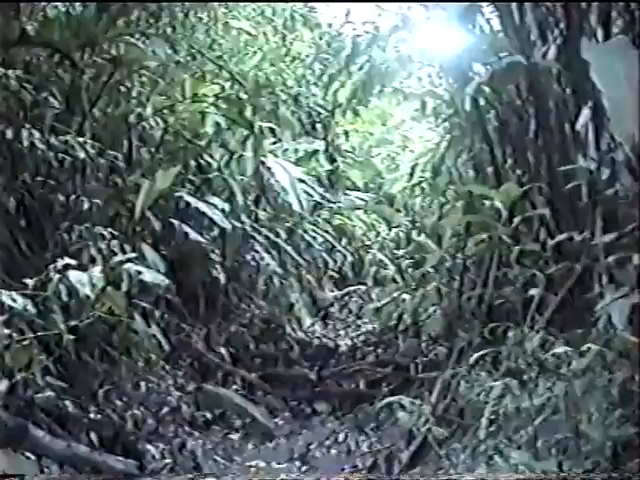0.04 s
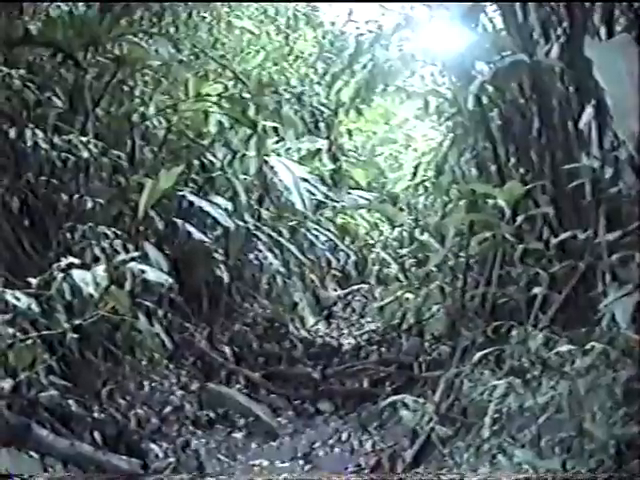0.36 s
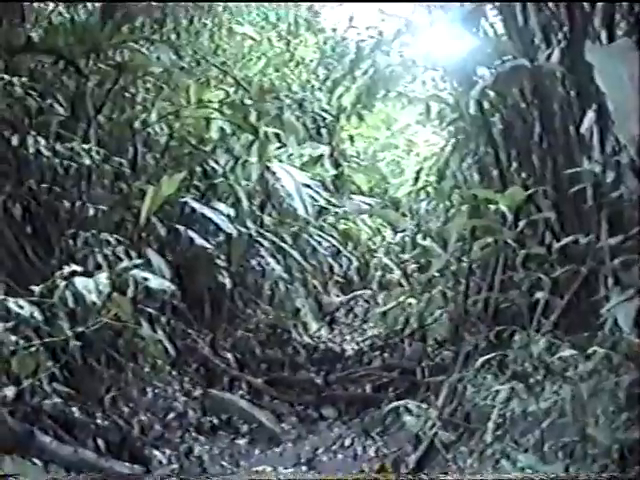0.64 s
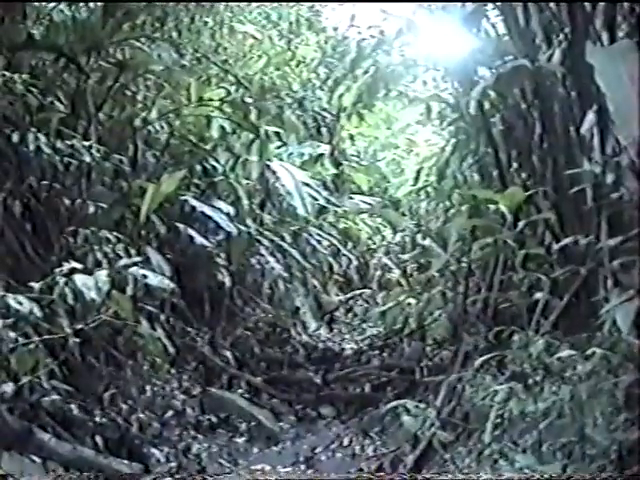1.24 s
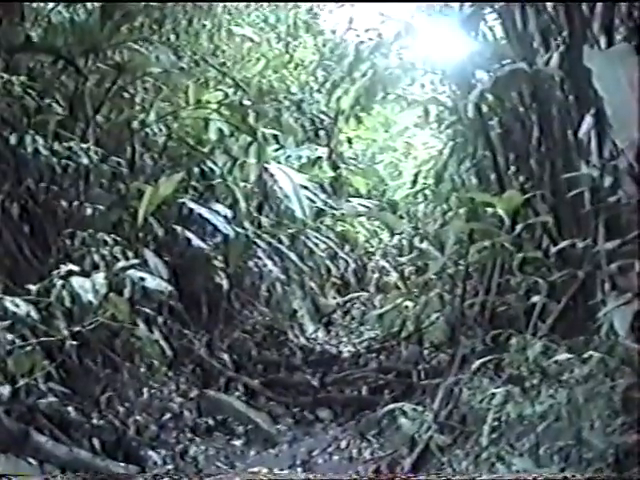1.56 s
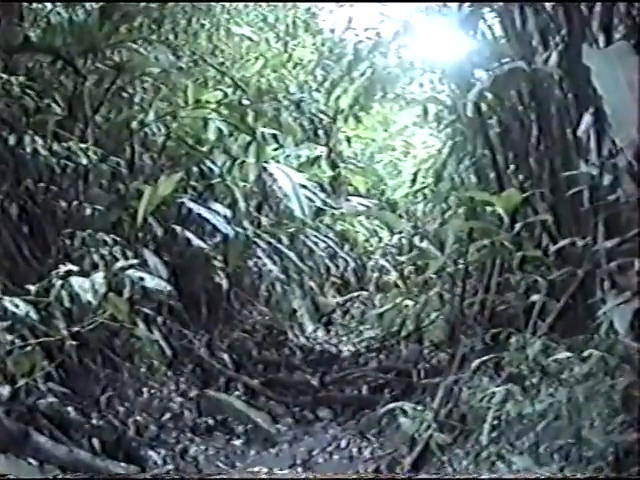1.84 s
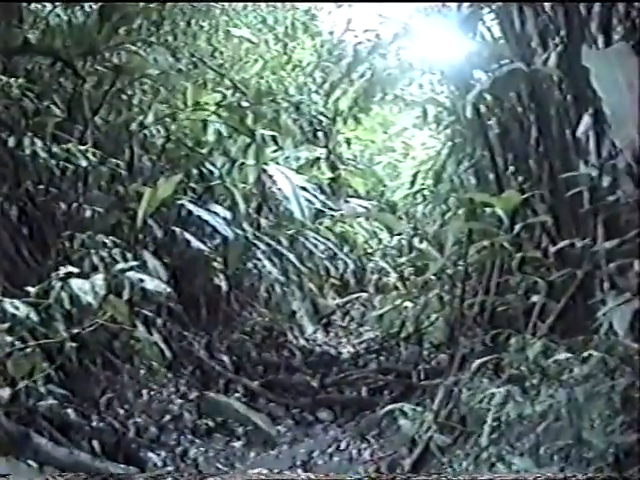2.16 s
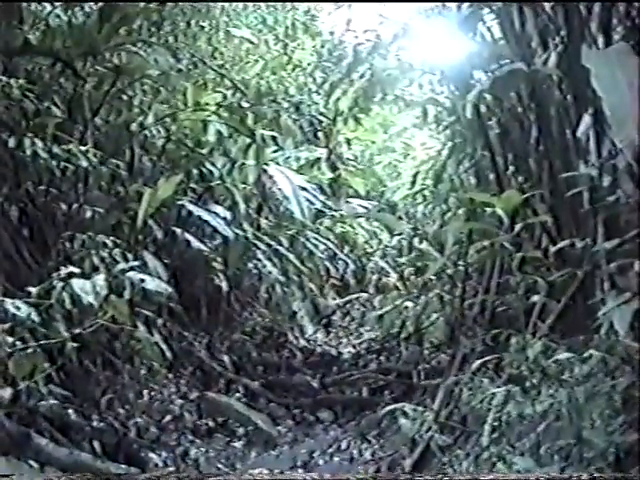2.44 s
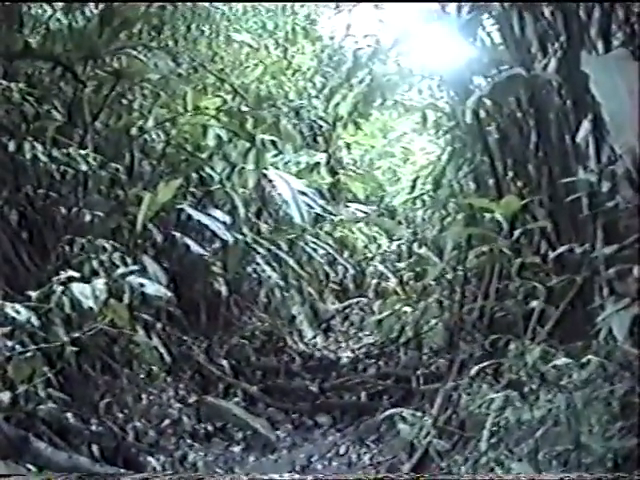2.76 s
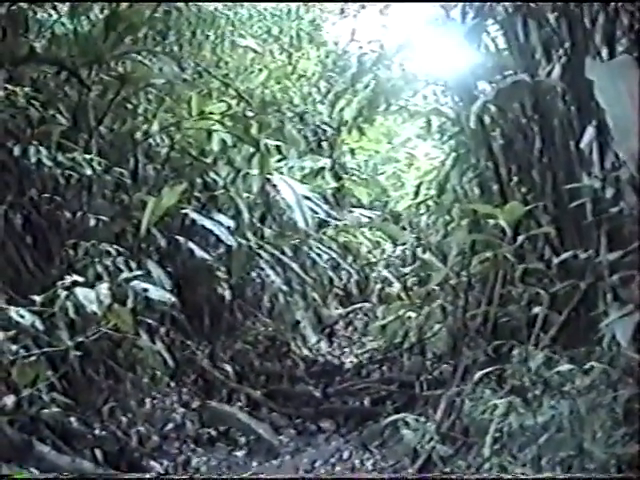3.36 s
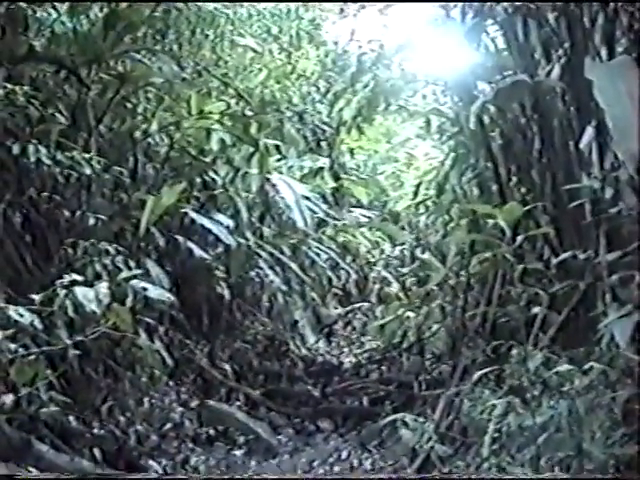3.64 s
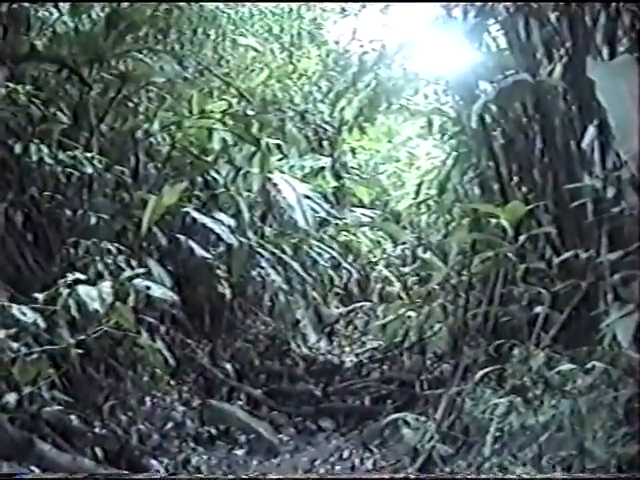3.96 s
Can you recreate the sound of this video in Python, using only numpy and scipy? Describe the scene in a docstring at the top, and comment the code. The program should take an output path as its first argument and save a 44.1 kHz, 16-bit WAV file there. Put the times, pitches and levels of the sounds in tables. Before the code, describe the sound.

Tree frogs calling with short hoots and high rising whistles in a forest, over steady hiss.

```python
"""Tree frogs in a tropical forest

Each call is a short low note, then a longer high whistle that slides up and levels off.
One frog sits near; others answer from further off, smeared by echoes from trunks and leaves,
over a faint far chorus. A small tape camera adds motor whine, hum and hiss. Mono."""
import sys
import numpy as np
from scipy import signal
from scipy.fft import rfft, irfft
from scipy.io import wavfile

SR = 44100
rng = np.random.default_rng(int(sys.argv[2]) if len(sys.argv) > 2 else 0)


def to_wav(sig):
    """Store sig (one row per channel, or 1-D mono) as 16-bit WAV at the path in sys.argv[1].

    Samples outside -1..1 are clipped; the rate is SR.
    """
    pcm = np.clip(np.atleast_2d(sig), -1, 1) * 32767
    pcm = np.round(pcm).astype(np.int16)
    wavfile.write(sys.argv[1], SR, pcm.T)  # frames by channels


N = 176400
ATTACK_S, RELEASE_S = .007, .014
JITTER_HZ, JITTER_RATE_HZ = 18.8, 270
LOW_T60_S, HIGH_T60_S = .45, .81  # tree tail of low and high notes


def from_db(db):
    """Decibels to gain."""
    return 10 ** (np.asarray(db) / 20)


def rms_one(x):
    """Scale to unit rms."""
    return x / np.sqrt(np.mean(x ** 2) + 1e-20)


def drift(rate_hz, size):
    """Smooth random wander, rms about 1."""
    hz = np.arange(N // 2 + 1) * SR / N
    return rms_one(irfft(rfft(rng.standard_normal(N)) / (1 + (hz / rate_hz) ** 2), N))[:size]


def add(out, x, start_s):
    """Mix x into out at start_s."""
    i = int(start_s * SR)
    x, i = x[max(-i, 0):], max(i, 0)
    out[i:i + len(x)] += x[:max(len(out) - i, 0)]


def tone(hz):
    """Unit-rms sine along a pitch curve."""
    return np.sqrt(2) * np.sin(2 * np.pi * np.cumsum(hz) / SR)


def gate(t, length_s):
    """Linear attack, hold, release."""
    return np.clip(t / ATTACK_S, 0, 1) * np.clip((length_s + RELEASE_S - t) / RELEASE_S, 0, 1)


def noise_bands(rows):
    """Noise through steep resonances."""
    hz = np.arange(N // 2 + 1) * SR / N
    out = np.zeros(N)
    for centre_hz, width_hz, db in rows:
        response = (1 + ((hz - centre_hz) / (.75 * width_hz)) ** 2) ** -1.5
        out += from_db(db) * rms_one(irfft(rfft(rng.standard_normal(N)) * response, N))
    return out


def hiss():
    """Steady camera hiss, falling toward the treble."""
    # noise spectrum: f/Hz, density/(dB per Hz)
    spectrum = [(20, -85), (50, -90.5), (130, -88), (250, -92), (500, -94), (1100, -96), (1800, -99.5),
                (2800, -100.5), (4800, -102), (7500, -101.5), (10000, -104), (13000, -107), (15500, -108.5)]
    points_hz, db = np.transpose(spectrum)
    hz = np.maximum(np.arange(N // 2 + 1) * SR / N, 1)
    colour = from_db(np.interp(np.log(hz), np.log(points_hz), db)) * np.sqrt(SR / 2)
    return irfft(rfft(rng.standard_normal(N)) * colour, N)


def camera(waver_hz=1.28, flutter=.23, drum_hz=25, scan_hz=15625):
    """Wavering motor whine, hum of the spinning head drum, casing whirr, thin line-scan tone."""
    # motor partials: f/Hz, level/dB
    partials = [(605, -82.5), (678.3, -79), (812, -81), (829, -72.5), (885.5, -76), (903.5, -73),
                (941, -80), (978.8, -63.5), (1016, -73), (1035.5, -68.5), (1052.5, -71), (1109, -77),
                (1149, -76), (1184.7, -72), (1269, -78), (1277, -74.5), (1566.4, -75)]
    # drum harmonics: multiple, level/dB
    harmonics = [(1, -74.5), (2, -68.5), (3, -74), (6, -71.5), (7, -79.5), (8, -77), (48, -77), (52, -76),
                 (56, -74), (60, -74.5), (64, -87), (72, -77), (76, -77.5)]
    # casing resonances: f/Hz, width/Hz, level/dB
    casing = [(1052, 300, -71.5), (1310, 67, -78.5), (1580, 160, -70.5)]
    t = np.arange(N) / SR
    whine, hum = np.zeros((2, N))
    for hz, db in partials:
        gain = from_db(db) * (1 + flutter * drift(22, N))
        whine += gain * tone(hz + waver_hz * drift(4.33, N))
    for multiple, db in harmonics:
        hum += from_db(db) * np.sqrt(2) * np.sin(2 * np.pi * (multiple * drum_hz * t + rng.random()))
    scan = from_db(-86) * tone(np.full(N, scan_hz))
    return whine + hum + noise_bands(casing) + scan


def far_chorus():
    """Distant frogs, blurred into noise bands."""
    # chorus bands: f/Hz, width/Hz, level/dB
    bands = [(2227, 410, -67), (3845, 170, -68.5), (4110, 106, -70.5)]
    return noise_bands(bands)


def mid_dip(bed, at_s=.784, width_s=.033, depth=.61, centre_hz=2060, width_oct=1.2):
    """The mid range dips once, briefly."""
    hz = np.maximum(np.arange(N // 2 + 1) * SR / N, 1)
    t = np.arange(N) / SR
    mids = irfft(rfft(bed) * np.exp(-(np.log2(hz / centre_hz) / width_oct) ** 2), N)
    return bed - depth * np.exp(-((t - at_s) / width_s) ** 2) * mids


def forest(x, echo_share, t60_s, thicket_t60_s=.53, thicket_db=16, first_echo_s=.017):
    """Direct sound plus thicket scatter and a tail from the trees; echo_share is by energy."""
    t = np.arange(SR) / SR
    trees = from_db(-60 * t / t60_s)
    thicket = from_db(thicket_db - 60 * t / thicket_t60_s)
    onset = np.clip(t / first_echo_s - 1, 0, 1)
    out = signal.fftconvolve(x, (trees + thicket) * onset * rng.standard_normal(SR))
    share = np.clip(echo_share, .01, .99)
    out *= np.sqrt(share * np.sum(x ** 2) / np.sum(out ** 2))
    add(out, np.sqrt(1 - share) * x, 0)
    return out


def low_note(length_s, hz):
    """Short, nearly pure hoot; the pitch sags and recovers."""
    t = np.arange(int((length_s + RELEASE_S) * SR)) / SR
    progress = np.minimum(t / length_s, 1)
    bend_hz = 80 * (progress - .45) ** 2
    return gate(t, length_s) * tone(hz + bend_hz + JITTER_HZ * drift(JITTER_RATE_HZ, len(t)))


def high_note(t, top_hz, glide_s, rise_hz=231.3, rasp_s=.014, rasp_hz=400):
    """Trembling whistle; starts raspy and clears as it slides up to top_hz."""
    hz = top_hz - rise_hz * np.exp(-t / glide_s) + JITTER_HZ * drift(JITTER_RATE_HZ, len(t))
    rasp = .075 + .98 * np.exp(-t / rasp_s)
    lowpass = signal.butter(3, rasp_hz, fs=SR, output="sos")
    rough = signal.sosfilt(lowpass, rng.standard_normal((2, SR)))[:, :len(t)]
    sidebands = rms_one(rough[0]) + 1j * rms_one(rough[1])
    wave = np.exp(2j * np.pi * np.cumsum(hz) / SR) * (np.sqrt(2) + rasp * sidebands)
    return wave.imag / np.sqrt(1 + rasp ** 2)


def spit(top_hz, note_db, relative_db=-12, rise_s=.018, grit_hz=360, below_hz=88.6):
    """Rough burst that opens a high note and hangs in the trees."""
    t = np.arange(SR // 8) / SR
    lowpass = signal.butter(2, grit_hz, fs=SR, output="sos")
    grit = rms_one(signal.sosfilt(lowpass, rng.standard_normal(len(t))))
    envelope = from_db(note_db + relative_db) * t / rise_s * np.exp(1 - t / rise_s)
    burst = envelope * grit * tone(np.full(len(t), top_hz - below_hz))
    return forest(burst, echo_share=.79, t60_s=HIGH_T60_S)


def other_frogs():
    """Answers from deeper in the forest; each high note swells, then fades."""
    # low notes: t/s, length/s, f/Hz, level/dB, echo share
    low_notes = [(0.059, 0.046, 2270, -62, .7), (.175, 0.024, 2140, -62.5, 0.3),
                 (0.489, 0.055, 2310, -63.5, 0.5), (.6, 0.048, 2130, -67, 0.2),
                 (.91, 0.063, 2130, -63, 0.4), (1.101, 0.021, 2205, -56, 0.5),
                 (1.424, 0.063, 2100, -53, 0.3), (1.57, 0.032, 2096, -60, 0.06),
                 (1.7, 0.063, 2280, -55, 0.1), (1.754, 0.038, 2210, -60, 0),
                 (2.038, 0.025, 2380, -60.5, 0.4), (3.004, 0.062, 2106, -54.5, 0.15),
                 (3.395, 0.059, 2320, -66.5, 0.1), (3.766, 0.048, 2020, -61.5, .6)]
    # high notes: t/s, length/s, top f/Hz, glide/s, level/dB, echo share
    high_notes = [(-.12, 0.093, 3935, 0.021, -47, 0.35), (0.113, 0.1, 3950, 0.032, -51.5, 0.33),
                  (0.21, 0.084, 4013, 0.025, -54, .6), (0.309, 0.17, 4050, 0.055, -60, 0.5),
                  (.5, 0.13, 4230, 0.0296, -62.5, 0.9), (0.628, 0.11, 3877, 0.029, -59, .5),
                  (0.881, .2, 4246, .02, -63, 0.5), (0.926, .19, 3720, 0.057, -60, 0.7),
                  (0.949, 0.08, 3930, 0.0218, -55.5, .4), (1.471, 0.25, 4003, 0.075, -44.5, 0.28),
                  (1.772, 0.1, 3980, 0.023, -47, 0.6), (1.774, 0.12, 4146, 0.0192, -50, 0.5),
                  (2.036, 0.075, 3902, 0.0173, -51.5, 0.46), (2.106, 0.13, 3914, .02, -57.5, 0.6),
                  (3.054, 0.22, 3980, 0.068, -45.5, 0.34), (3.25, 0.051, 4210, .02, -58, 0.6),
                  (3.45, 0.16, 4120, 0.021, -63, 0), (3.807, 0.2, 3645, 0.039, -46, 0.66),
                  (3.943, 0.14, 3910, 0.029, -52.5, 0.1)]
    out = np.zeros(N)
    for start_s, length_s, hz, db, echo_share in low_notes:
        add(out, forest(from_db(db) * low_note(length_s, hz), echo_share, LOW_T60_S), start_s)
    for start_s, length_s, top_hz, glide_s, db, echo_share in high_notes:
        t = np.arange(int((length_s + RELEASE_S) * SR)) / SR
        swell_db = np.interp(t / length_s, [0, .57, 1], [-9, 0, -14])
        note = from_db(db + swell_db) * gate(t, length_s) * high_note(t, top_hz, glide_s)
        add(out, forest(note, echo_share, HIGH_T60_S), start_s)
        add(out, spit(top_hz, db), start_s)
    return out


def near_frog(top_hz=3968, low_echo_db=-14.5, high_echo_db=-10, trunk_s=.056, trunk_db=-10.5):
    """Two clear two-note calls; the low note bounces off a trunk."""
    # low notes: t/s, length/s, f/Hz, level/dB
    low_notes = [(1.163, 0.043, 2119, -46.5), (2.725, 0.048, 2106, -46.5)]
    # high-note envelopes, one list per note: t/s, level/dB
    high_envelopes = [
        [(1.21, -49), (1.222, -50), (1.234, -62), (1.244, -43), (1.286, -39), (1.3, -49), (1.4, -41),
         (1.424, -62), (1.438, -55), (1.458, -75), (1.47, -82)],
        [(2.775, -50.5), (2.807, -58.5), (2.819, -38), (2.831, -47), (2.859, -37), (2.887, -49), (2.915, -48),
         (2.933, -37), (2.963, -42.5), (2.987, -63), (2.997, -43.5), (3.045, -59)],
    ]
    out = np.zeros(N)
    for start_s, length_s, hz, db in low_notes:
        note = forest(from_db(db) * low_note(length_s, hz), from_db(low_echo_db) ** 2, LOW_T60_S)
        add(out, note, start_s)
        add(out, from_db(trunk_db) * note, start_s + trunk_s)
    for points in high_envelopes:
        times_s, db = np.transpose(points)
        start_s, length_s = times_s[0], times_s[-1] - times_s[0]
        t = np.arange(int((length_s + RELEASE_S) * SR)) / SR
        envelope = from_db(np.interp(t + start_s, times_s, db)) * gate(t, length_s)
        note = envelope * high_note(t, top_hz, glide_s=.021)
        add(out, forest(note, from_db(high_echo_db) ** 2, HIGH_T60_S), start_s)
        add(out, spit(top_hz, db.max()), start_s)
    return out


def scene():
    """Frogs over the background, same on both channels."""
    frogs = near_frog() + other_frogs()
    bed = mid_dip(hiss() + far_chorus() + camera())
    return np.tile(frogs + bed, (2, 1))


def record(dry):
    """Steep treble cut."""
    cutoff_hz = 15750
    return signal.sosfilt(signal.ellip(12, .1, 70, cutoff_hz, fs=SR, output="sos"), dry)


dry = scene()
out = record(dry)
to_wav(out)
```